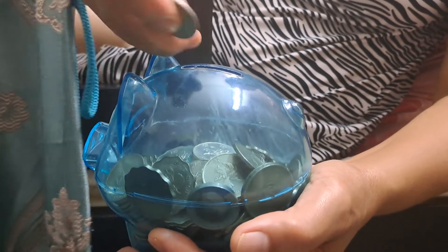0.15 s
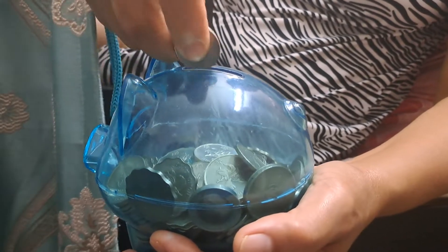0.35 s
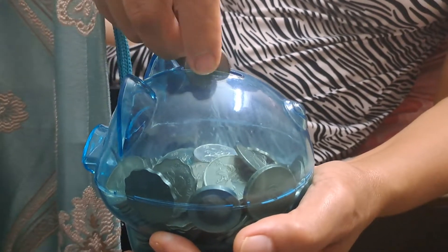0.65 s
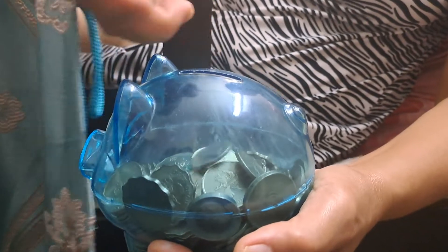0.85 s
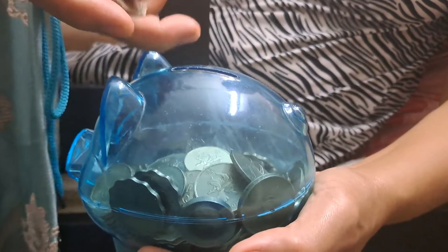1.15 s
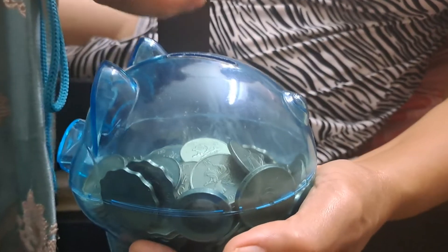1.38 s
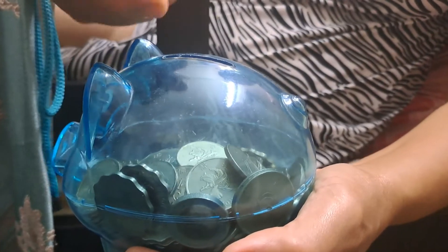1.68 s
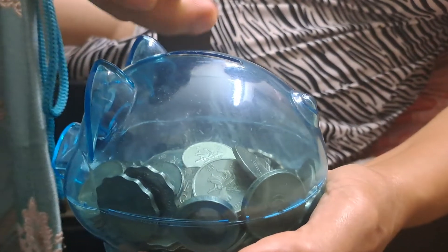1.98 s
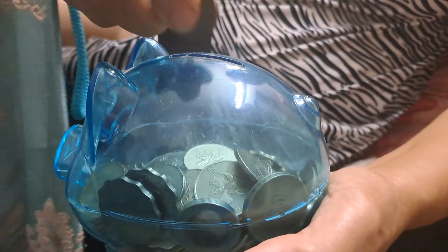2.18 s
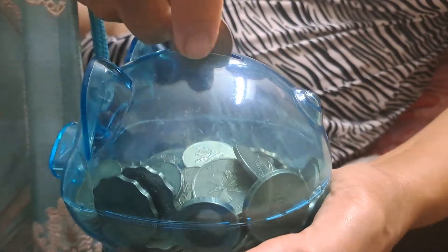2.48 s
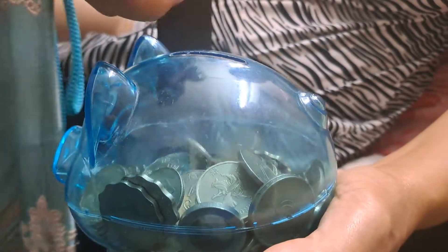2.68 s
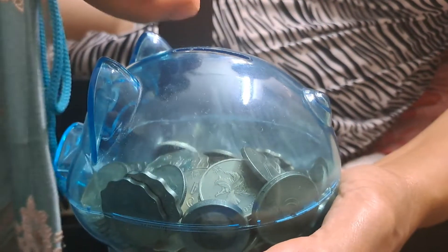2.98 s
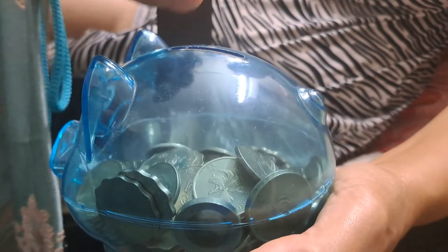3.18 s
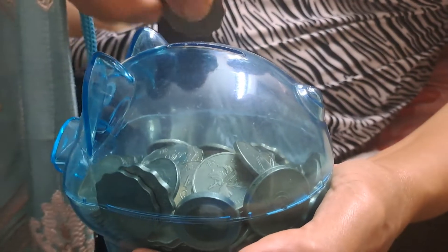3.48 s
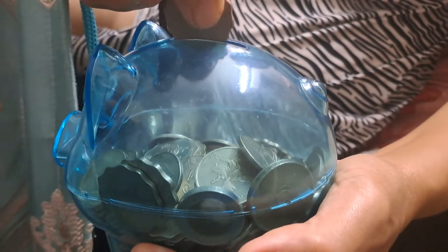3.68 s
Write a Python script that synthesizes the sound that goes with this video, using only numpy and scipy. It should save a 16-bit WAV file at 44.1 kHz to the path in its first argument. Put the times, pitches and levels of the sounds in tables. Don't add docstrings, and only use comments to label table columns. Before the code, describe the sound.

Coins drop through a slot into a hollow thin plastic money box, clattering onto other coins.

```python
import sys
import numpy as np
from scipy import signal
from scipy.fft import rfft, irfft, next_fast_len
from scipy.io import wavfile

SR = 44100
rng = np.random.default_rng(int(sys.argv[2]) if len(sys.argv) > 2 else 0)


def store_wav(level_fs):
    pcm = np.round(np.clip(np.atleast_2d(level_fs), -1, 1) * 32767)
    wavfile.write(sys.argv[1], SR, pcm.T.astype(np.int16))


def undo_db(level):
    steps = np.asarray(level, float) / 20
    return 10 ** steps


N = 169785
TIME_S = np.arange(N) / SR
OPPOSITE = np.array([[1], [-1]])


def rms_one(x):
    return x / np.sqrt(np.mean(x ** 2) + 1e-20)


def in_time(curve):
    return np.interp(TIME_S, *np.transpose(curve), left=-120, right=-120)


def at_hz(points, hz):
    f, value = np.transpose(points)
    return np.interp(np.log(hz), np.log(f), value)


def cut(x, hz, kind):
    return signal.sosfilt(signal.butter(4, hz, kind, fs=SR, output="sos"), x)


def ring(clicks, hz, t60):
    r = undo_db(-60 / (max(t60, .002) * SR))
    w = 2 * np.pi * hz / SR
    return signal.lfilter([0, np.sin(w)], [1, -2 * r * np.cos(w), r * r], clicks + 1e-18)


CRACK_S, RISE_S, RATTLE_S = 0.0012, .0004, 0.012
BLOW_S = .09
SHIFT_SHARE, SCATTER_DB = .06, 2.5
OFF_PITCH_DB_PER_OCTAVE = 15.5
APART_HZ = 1920


def strike(s, db, modes, t60, rattle_db, crack_s, best_hz=None):
    length = int(BLOW_S * SR)
    out = np.zeros((2, N + length))
    t = np.arange(length) / SR
    hz, level_db = np.transpose(modes)
    force = (1 - np.exp(-t / RISE_S)) * (np.exp(-t / crack_s) + undo_db(rattle_db) * np.exp(-t / RATTLE_S))
    for k, start in enumerate((s * SR).astype(int)):
        mid, side = rng.choice([-1., 1.], (2, length)) * force
        moved = np.minimum(hz * (1 + SHIFT_SHARE * rng.uniform(-1, 1, len(hz))), 16200)
        gain_db = db[k] + level_db - 17.5 + SCATTER_DB * rng.uniform(-1.09, 1, len(hz))
        if best_hz is not None:
            moved[np.argmin(abs(hz - best_hz[k]))] = best_hz[k]
            gain_db -= OFF_PITCH_DB_PER_OCTAVE * abs(np.log2(moved / best_hz[k]))
        for f, gain in zip(moved, undo_db(gain_db)):
            width = f / (f + APART_HZ) / 2
            out[:, start:start + length] += ring(gain * (mid + width * side * OPPOSITE), f, t60)
    return out[:, :N]


# f/Hz, level/dB
COIN_EDGE = [(7800, -5.5), (8700, 0), (9700, 2), (10800, 3.5), (12000, 1), (13300, -11), (14400, 1.5),
             (15500, -1)]
EDGE_T60_S, THUD_T60_S = .0035, .01


def blows(rows, modes, t60, rattle_db, crack_s=CRACK_S, thud=True, edge=True):
    s, db, pitch, *rel = np.transpose(rows)
    body = [m for m in modes if m[0] > 1500]
    low = [m for m in modes if m[0] <= 1500]
    out = strike(s, db, body, t60, rattle_db, crack_s, pitch)
    if thud:
        out = out + strike(s, db + rel[0] + 3, low, THUD_T60_S, rattle_db - 2, crack_s)
    if edge:
        out = out + strike(s, db + rel[-1] + 3.5, COIN_EDGE, EDGE_T60_S, rattle_db, crack_s)
    return out


SLIDE_CLICKS_PER_S, SLIDE_UNEVEN_DB = 2200, 2
PATCH_S, PATCH_DB = .025, 3.5


def slide(curve, modes, t60, edge_db):
    out = np.zeros((2, N))
    bank = [m for m in modes if m[0] > 1500] + [(hz, db + edge_db) for hz, db in COIN_EDGE]
    heights = undo_db(SLIDE_UNEVEN_DB * np.minimum(rng.exponential(1, N), 4))
    clicks = heights * (rng.random(N) < SLIDE_CLICKS_PER_S / SR)
    sizes = rng.standard_normal((2, N))
    for k, (hz, level_db) in enumerate(bank):
        patch = np.interp(TIME_S / PATCH_S, np.arange(200), rng.standard_normal(200))
        own_clicks = clicks * np.roll(sizes, 977 * k, axis=1)
        decay_s = t60 if hz < 7500 else EDGE_T60_S
        out += undo_db(level_db + PATCH_DB * patch) * ring(own_clicks, hz, decay_s)
    return rms_one(out) * undo_db(in_time(curve))


# f/Hz, level/dB
SHELL_MODES = [(350, -14), (620, -4), (850, -4.5), (1280, -0.5), (1950, -13.5), (2500, 2.5), (3250, 5),
               (3750, -8.5), (4350, -1), (5100, 4), (5900, 3), (6900, -2)]
SHELL_T60_S = .0055
# t/s, peak level/dB, strongest f/Hz, shell thud re peak/dB, edge
# re peak/dB
LANDINGS = [
    (0.822, -22.5, 3210, -8.5, -3),
    (0.8809, -19, 5420, -8, -19),
    (0.9113, -17, 3700, -30, -11.5),
    (0.9214, -22.5, 2860, -25, -21),
    (0.9722, -24, 3330, -27, -11),
    (1.0306, -28.5, 5200, -63, -10.5),
    (1.0645, -31, 3440, -49, 0.5),
    (1.1428, -22.5, 3700, -19.5, -17.5),
            (2.6733, -19.5, 3395, -16.5, -6), (2.702, -19, 5300, -6.5, -8),
                   (2.7416, -20, 3340, -25.5, 1), (2.7588, -24.5, 3490, -17.5, -11),
                   (2.8611, -28.5, 3880, -17.5, -9), (2.8802, -22.5, 3200, -43, -10.5),
                   (2.944, -27.5, 2820, -28.5, 2), (2.9484, -20.5, 3270, -46, -9.5),
                   (2.972, -20, 3170, -11, -4.5), (3.077, -14.5, 3060, -21.5, -12.5),
                   (3.1133, -30, 4880, -34, -16)]
# t/s, peak level/dB, strongest f/Hz, metal edge re peak/dB
SETTLES = [(0.8255, -21.5, 5470, -8.5), (1.088, -35, 4770, -20), (1.1007, -35, 4860, -5),
           (1.121, -28, 4430, -26), (1.1465, -24, 3500, -20), (2.6765, -21, 4430, -12.5),
           (2.715, -25.5, 3240, -9.5), (2.779, -27, 3200, -5.5), (2.819, -31.5, 3500, -17),
           (2.829, -27, 3270, -8), (2.894, -28, 3300, -27.5), (2.917, -37, 3700, -9),
           (3.018, -34, 3490, -23), (3.055, -30, 4440, -32), (3.069, -34, 4400, -24),
           (3.095, -26.5, 3300, -12)]
# t/s, level/dB
PILE_SLIDE = [(1.04, -59), (1.1, -42), (1.13, -49), (1.2, -62), (1.25, -99), (2.57, -97), (2.62, -44.5),
              (2.665, -77.5), (2.68, -26.5), (2.78, -40), (2.87, -55), (2.93, -47), (3.0, -45.5),
              (3.06, -49.5), (3.1, -45), (3.15, -86.5), (3.2, -101)]


def pile():
    landings = blows(LANDINGS, SHELL_MODES, SHELL_T60_S, rattle_db=-14.0)
    settling = blows(SETTLES, SHELL_MODES, SHELL_T60_S, rattle_db=-13.5, thud=False)
    return landings + settling + slide(PILE_SLIDE, SHELL_MODES, SHELL_T60_S, edge_db=-7)


# t/s, peak level/dB, strongest f/Hz, shell thud re peak/dB, metal edge re peak/dB
HARDEST = (2.7949, -8.5, 2400, -22, -14)
# f/Hz, level/dB
WALL_MODES = [(2080, -18), (2430, -12.5)]
WALL_T60_S, FURTHER_LEFT_S = 0.015, 0.00016


def hardest_landing():
    click = np.arange(N) == int((HARDEST[0] + RISE_S) * SR)
    wall = sum(ring(undo_db(db) * click, hz, WALL_T60_S) for hz, db in WALL_MODES)
    left, right = blows([HARDEST], SHELL_MODES, SHELL_T60_S, rattle_db=-17) + wall
    return np.array([left, np.roll(right, int(FURTHER_LEFT_S * SR))])


# f/Hz, level/dB
PALM_MODES = [(2900, -15.5), (3450, -5), (3990, -7.5), (4400, -4), (5020, -2.5), (5600, -9), (6700, -3)]
PALM_T60_S, PALM_CRACK_S = .008, 0.00077
# t/s, peak level/dB, strongest f/Hz, metal edge re peak/dB
CHINKS = [(0.1309, -31, 5300, -8), (0.2078, -39.5, 4450, -16.5), (1.2168, -22.5, 5010, -31),
          (1.2315, -24, 4600, -28.5), (1.2434, -22.5, 5100, -12), (1.3015, -31.5, 5300, -14),
          (1.4038, -40.5, 4340, -31), (1.4479, -27, 4070, -16), (1.4564, -27.5, 4270, -21),
          (1.4697, -20, 3970, -17), (1.511, -41, 4430, -5.5), (1.5594, -38.5, 4230, -7),
          (1.6096, -34.5, 4850, -10), (1.7423, -43, 3450, -9.5), (1.9124, -44, 3850, -10),
          (1.933, -34, 4100, -42), (1.9518, -38.5, 4200, -31), (2.0574, -41, 3840, -22),
          (2.0805, -29, 4700, -19), (2.1357, -17.5, 3920, -14), (3.1987, -23.5, 4250, -17.5),
          (0.001, -45.5, 5140, -13.5), (0.04, -53, 5760, -13), (0.29, -58, 4570, -20),
          (1.2075, -39.5, 4000, -24), (1.2225, -21, 5160, -21), (1.237, -38, 4650, -36),
          (1.274, -45, 4600, -7), (1.4213, -42, 4280, -14), (1.441, -35, 4180, -26),
          (1.605, -29, 4400, -16), (1.626, -30, 4800, -15), (1.646, -39, 3550, -13),
          (1.664, -50, 4500, -19), (1.8952, -55, 3770, -17), (1.9206, -43, 3900, -20),
          (2.0858, -26, 4680, -17), (2.1217, -37, 3970, -12), (2.1686, -22.5, 3340, -19)]
# t/s, level/dB
PALM_SLIDE = [(0.132, -58), (0.27, -84), (1.19, -77), (1.215, -40), (1.26, -64), (1.35, -63.5), (1.43, -71),
              (1.47, -51), (1.53, -64.5), (1.62, -50.5), (1.7, -70.5), (1.8, -69.5), (1.9, -109),
              (1.94, -62.5), (2.03, -82), (2.09, -57), (2.2, -49), (2.23, -107)]


def palm():
    chinks = blows(CHINKS, PALM_MODES, PALM_T60_S, rattle_db=-15.0, crack_s=PALM_CRACK_S, thud=False)
    return chinks * undo_db(1.5) + slide(PALM_SLIDE, PALM_MODES, PALM_T60_S, edge_db=-6.5)


# f/Hz, level/dB
SLOT_MODES = [(650, -4.5), (1200, 0.5), (2000, -12.5), (2590, 5.5), (3280, 0), (4360, -17), (5500, -14.5),
              (6800, -20)]
SLOT_T60_S, SLOT_HIGH_CUT_HZ, SLOT_EDGE_DB = .012, 6000, -33
# t/s, peak level/dB, strongest f/Hz, thud re peak/dB
SLOT_TAPS = [(0.422, -43, 5570, -14), (0.446, -35.5, 5530, -14), (0.6498, -51.5, 2650, -10.5),
             (0.7655, -43.5, 3360, -4), (2.375, -57, 2620, 5), (2.4432, -60, 2420, 13),
             (2.522, -32, 2520, -21.5), (2.5359, -36, 2550, -10), (2.5495, -32.5, 3080, -5.5),
             (2.5916, -34, 2540, -13.5), (2.6145, -38.5, 5500, -26), (2.62, -44.5, 3370, -13),
             (2.6288, -22.5, 3420, -23.5), (3.8047, -55.5, 3400, 5.5)]


def slot():
    s, db = np.array(SLOT_TAPS)[:, :2].T
    lips = blows(SLOT_TAPS, SLOT_MODES, SLOT_T60_S, rattle_db=-7.5, edge=False)
    rim = strike(s, db + SLOT_EDGE_DB, COIN_EDGE, EDGE_T60_S, rattle_db=-13, crack_s=CRACK_S)
    return cut(lips, SLOT_HIGH_CUT_HZ, "low") + rim


# t/s, f/Hz, level/dB, t60/s
FREE_RINGS = [(0.8812, 13230, -29, .13), (0.8812, 13414, -35, .1), (0.9116, 13320, -39, .12),
              (0.9725, 13280, -48, .08), (1.0308, 13230, -36, .12), (1.0308, 13414, -43, .1),
              (1.1007, 8560, -45, .12), (1.16, 13230, -57, .15), (2.172, 8620, -53, .15),
              (2.795, 9453, -39, .2), (2.795, 9550, -37, .25), (2.7415, 3300, -30, .04),
              (2.885, 9520, -47, .4)]


def free_coins():
    out = np.zeros(N)
    for s, hz, db, t60 in FREE_RINGS:
        out += ring(undo_db(db) * (np.arange(N) == int(s * SR)), hz, t60)
    return out


# t/s, level/dB, f/Hz, t60/s
GLINTS = [(0.436, -64, 4400, .1), (0.6499, -43.5, 2560, 0.028), (0.825, -28, 14600, .018),
          (0.911, -30, 14800, .02), (1.0653, -16, 8630, 0.011), (1.455, -22, 11860, 0.0047),
          (1.612, -31, 9240, .02), (1.953, -42, 11700, .015), (2.085, -33.5, 12640, 0.021),
          (2.135, -29, 15100, .04), (2.741, -22.5, 8680, .01), (2.797, -5, 5830, 0.0079),
          (2.861, -28.5, 12380, .008), (2.973, -17, 10650, 0.012), (3.1138, -14, 4680, 0.0063)]


def glints():
    out = 0
    for s, db, hz, t60 in GLINTS:
        out = out + strike(np.array([s]), [db], [(hz, 0)], t60, rattle_db=-30, crack_s=.0015, best_hz=[hz])
    return out


# f/Hz, level/dB
RIGHT_SHADE = [(200, -6.5), (700, -2.5), (2400, -1.5), (4400, -1.5), (8000, -20), (15000, -21)]
ROOM_T60_S, TREBLE_T60_SHARE, ROOM_DB, RIGHT_LAG_S = 0.21, .7, -19, .00023


def room(x):
    size = next_fast_len(N + SR)
    hz = np.arange(size // 2 + 1) * SR / size + 1
    t60 = ROOM_T60_S * (1 - (1 - TREBLE_T60_SHARE) * hz / 16000)
    wet = np.zeros((2, len(hz)), complex)
    for k, lag in enumerate(rng.uniform(.005, .022, 20)):
        loop = undo_db(-60 * lag / t60) * np.exp(-2j * np.pi * hz * lag)
        wet[k % 2] += loop / (1 - loop) * (-1) ** (k // 2)
    left = undo_db(0.5) + 0 * hz
    right = np.exp(-2j * np.pi * hz * RIGHT_LAG_S) * undo_db(-0.5 + at_hz(RIGHT_SHADE, hz))
    spectrum = rfft(x, size) * (1 + undo_db(ROOM_DB) * wet) * np.array([left, right])
    return irfft(spectrum, size)[:, :N]


def narrow(hz, width_hz, side_db=-15):
    noise = rng.standard_normal((2, N))
    mid, side = ring(ring(noise, hz, 2.2 / width_hz), hz, 1.1 / width_hz)
    return rms_one(mid + undo_db(side_db) * side * OPPOSITE)


# f/Hz, level/dB per Hz
AIR = [(70, -6.5), (161, -18), (373, -20), (800, -28.5), (2600, -41), (6300, -58), (12000, -52),
       (16000, -41)]
AIR_DB = -53
# f/Hz, likeness
LIKENESS = [(60, .97), (240, .87), (950, .65), (3770, .2)]
# f/Hz, width/Hz, level/dB
FAN_LINES = [(94.3, 18, -58.5), (312.6, 11, -69.5), (375.6, 23, -70), (760, 19, -74.5), (148.5, 89, -58.5)]
# t/s, level/dB
THROB = [(0.0, -59), (0.5, -51), (3.85, -68)]


def background():
    air = 0
    edges = 60 * 2 ** np.arange(0, 8.3, .5)
    white = rng.standard_normal((2, 2, N))
    for k, (low, high) in enumerate(zip(edges, edges[1:])):
        band = signal.butter(2, [low, high], "band", fs=SR, output="sos")
        mid, side = signal.sosfilt(band, white[k % 2])
        center = np.sqrt(low * high)
        alike = np.clip(at_hz(LIKENESS, center), 0, 1)
        stereo = np.sqrt(1 + alike) * mid + np.sqrt(1 - alike) * side * OPPOSITE
        air = air + undo_db(at_hz(AIR, center)) * stereo
    lines = sum(undo_db(db) * narrow(hz, width) for hz, width, db in FAN_LINES)
    throb = undo_db(in_time(THROB)) * narrow(47, width_hz=5.3)
    return undo_db(AIR_DB - 6.5) * rms_one(air) + lines + throb


def scene():
    box = cut(pile() + hardest_landing(), 380, "high")
    hand = cut(palm(), 3280, "high")
    return room(box + hand + slot() + free_coins() + glints()) + background()


def low_pass(x):
    return signal.sosfilt(signal.butter(12, 16890, fs=SR, output="sos"), x)


def record(dry):
    top_cut = signal.cheby2(10, 50, 16850, fs=SR, output="sos")
    mix = signal.sosfilt(top_cut, dry)
    return low_pass(mix)


dry = scene()
out = record(dry)
store_wav(out)
```